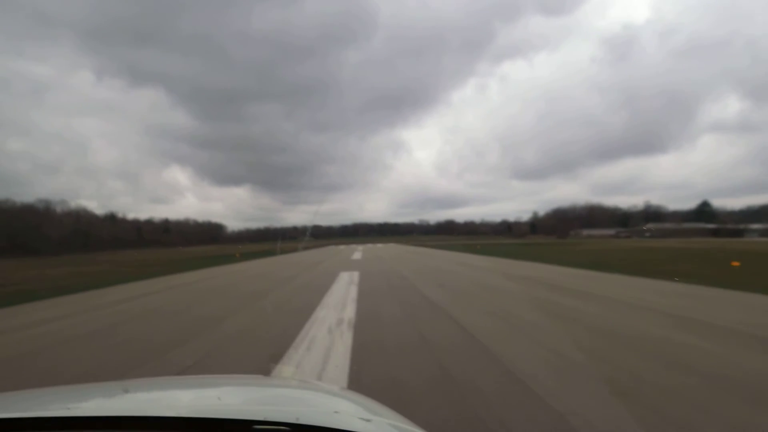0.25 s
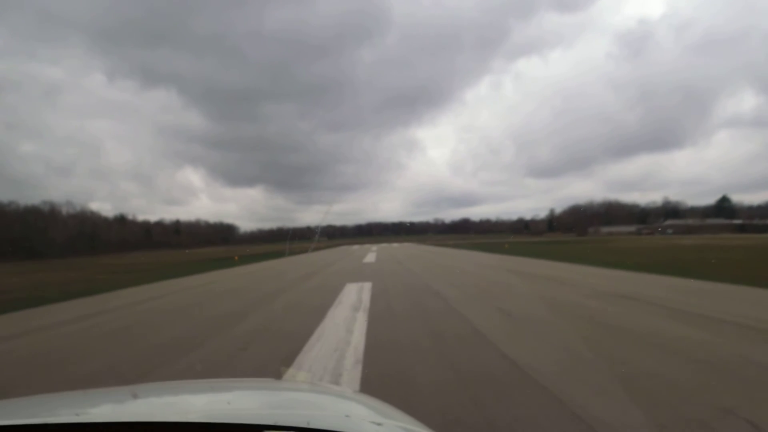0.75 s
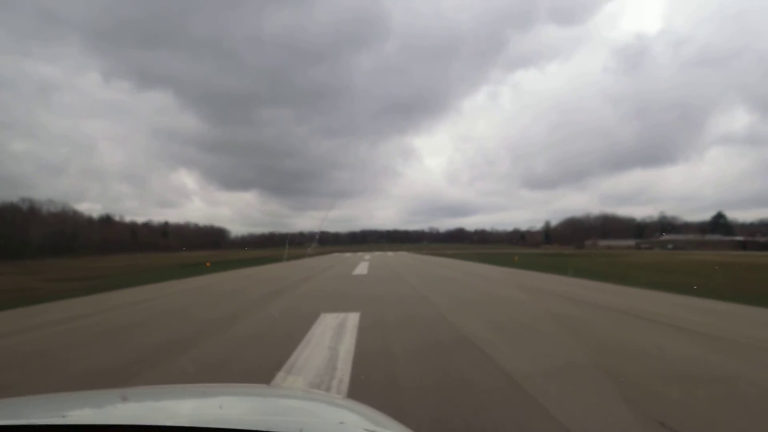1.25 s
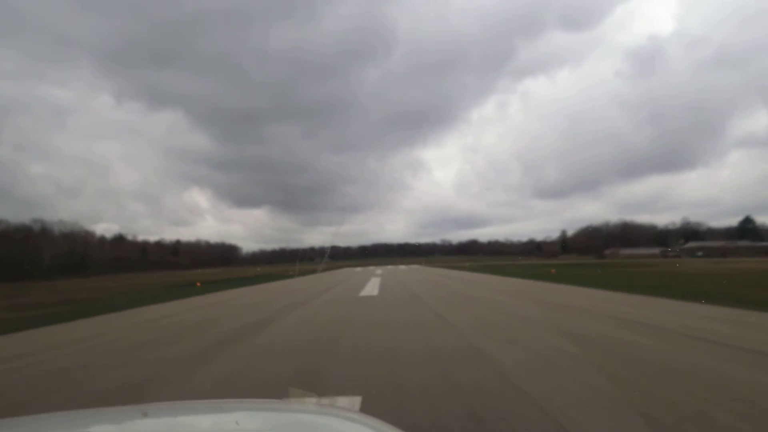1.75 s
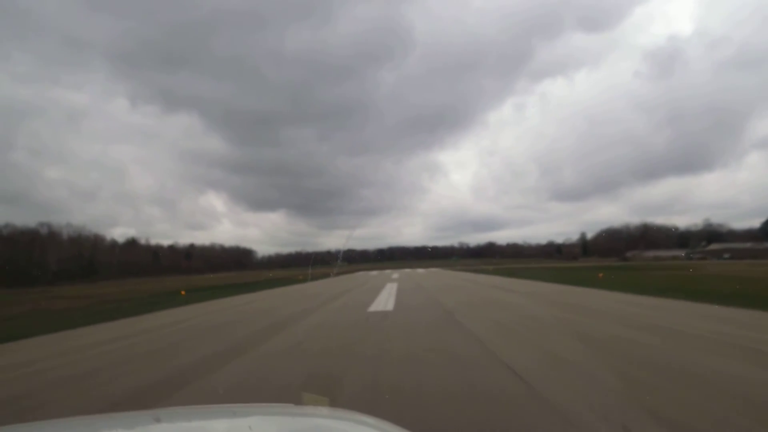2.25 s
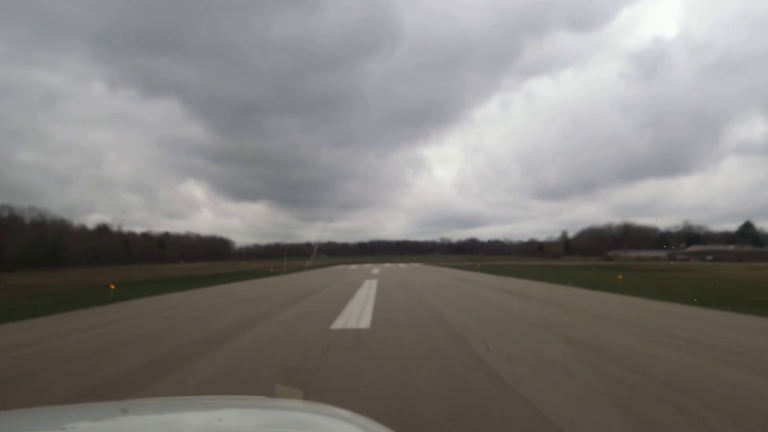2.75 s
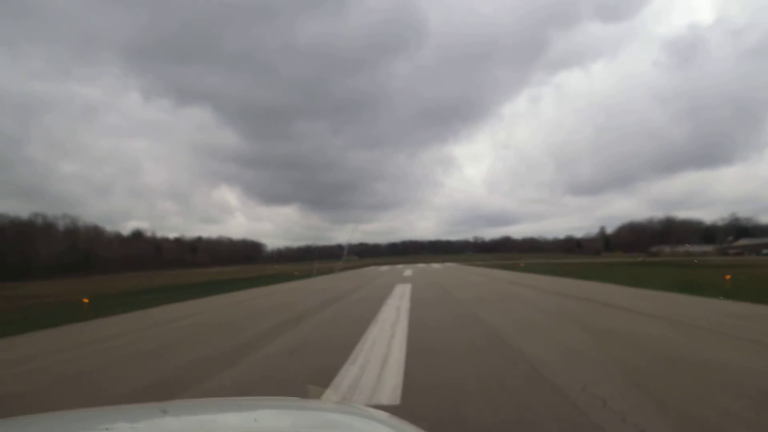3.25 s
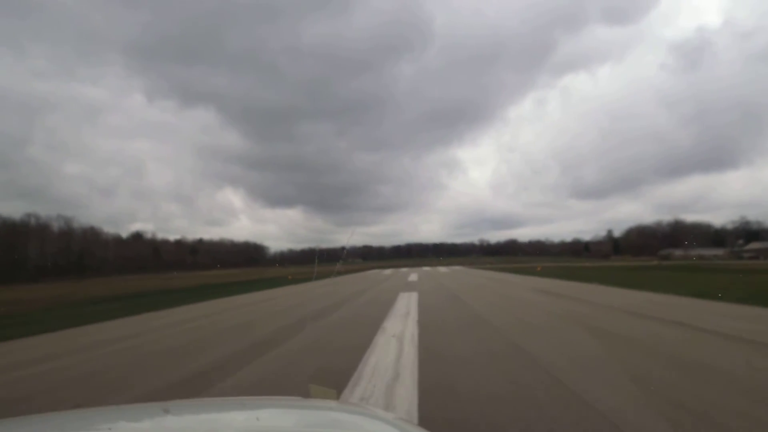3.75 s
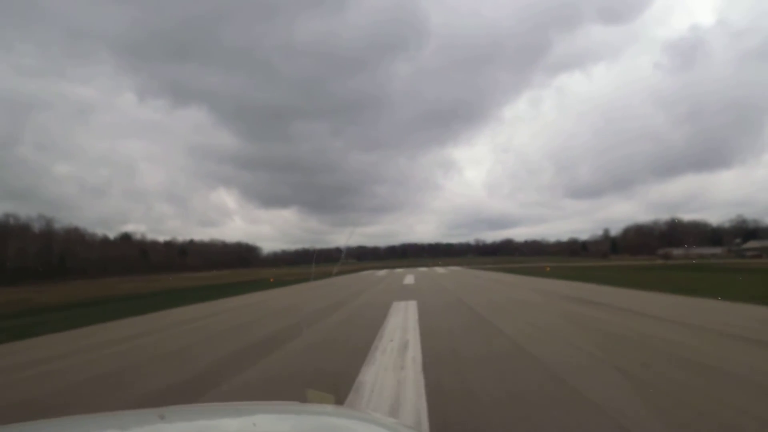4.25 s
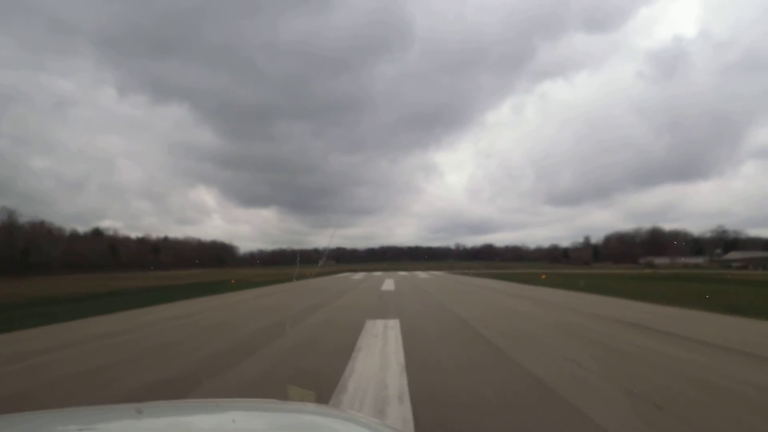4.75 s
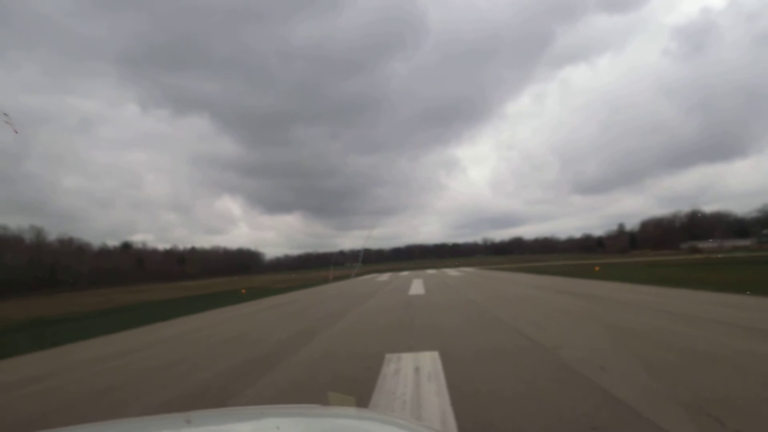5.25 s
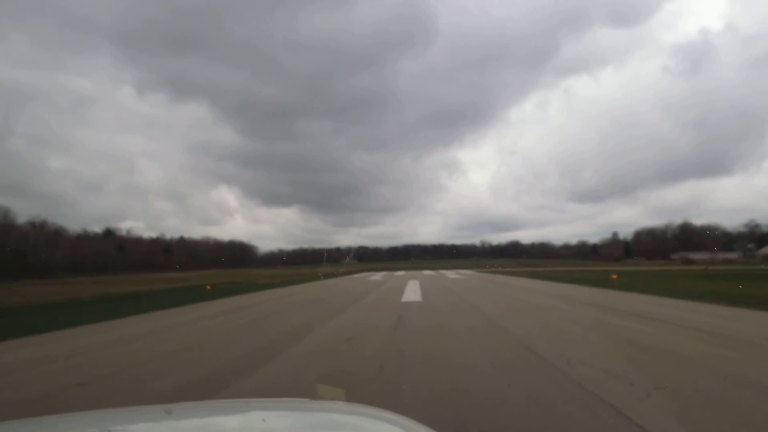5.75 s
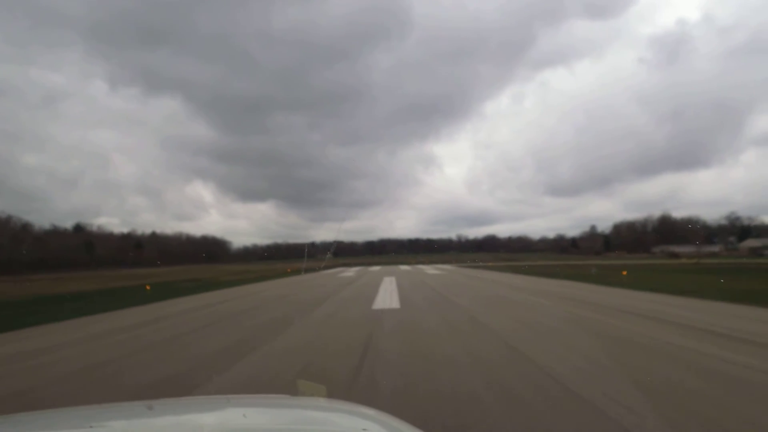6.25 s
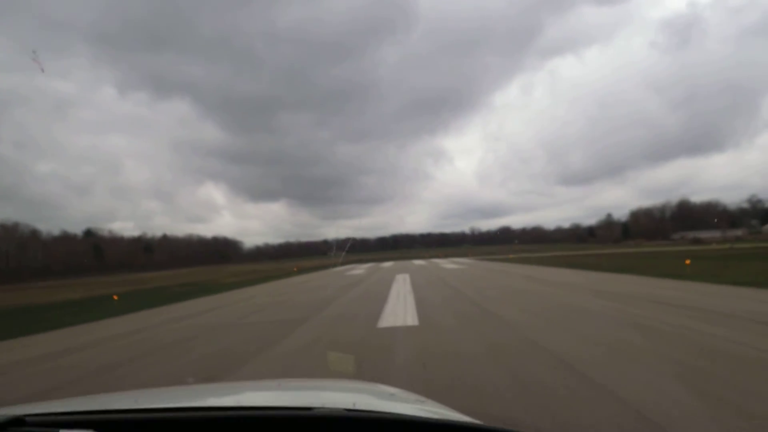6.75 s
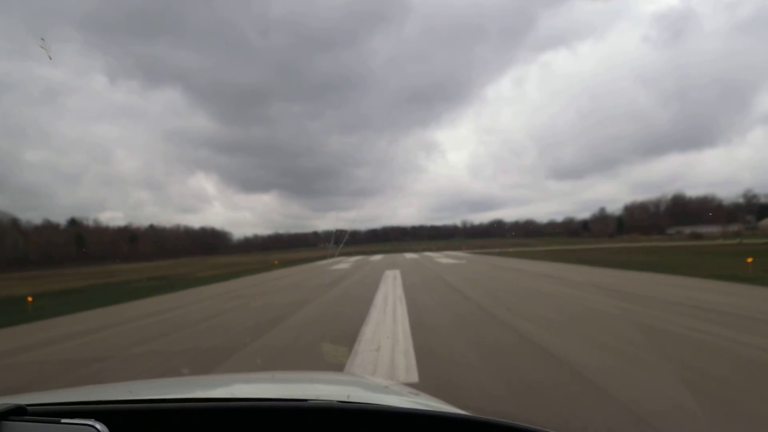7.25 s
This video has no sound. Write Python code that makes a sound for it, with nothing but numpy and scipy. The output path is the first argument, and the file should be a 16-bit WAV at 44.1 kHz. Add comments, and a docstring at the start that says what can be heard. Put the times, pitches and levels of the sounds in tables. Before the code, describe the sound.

Deep wheel rumble and a low propeller drone fill a light aircraft cabin, broken by a loud clattering bump and scattered trim knocks.

```python
"""Inside a light aircraft rolling out along a runway, its six-cylinder engine idling near 840 rpm.
Exhaust and propeller drone under ticking valves. Out-of-round tyres drum, and the runway's grain
rumbles through the cabin as the wheels slow. Leaking air hisses, instruments whine, and loose trim
creaks and knocks. One hard jolt on the camera mount makes the limiter duck everything for a second."""
import sys
import numpy as np
from scipy import signal
from scipy.fft import rfft, irfft
from scipy.io import wavfile
from scipy.ndimage import uniform_filter1d, minimum_filter1d

SR = 44100
rng = np.random.default_rng(int(sys.argv[2]) if len(sys.argv) > 2 else 0)


def master_out(mix):
    """Clip the mix to full scale and print it as 16-bit PCM to the path in sys.argv[1]."""
    frames = np.transpose(np.atleast_2d(mix))
    ceiling = np.clip(frames, -1, 1)
    pcm = np.round(ceiling * 32767).astype(np.int16)
    wavfile.write(sys.argv[1], SR, pcm)


N = 330750
TIME = np.arange(N) / SR
FREQS = np.fft.rfftfreq(N, 1 / SR)

# a wandering idle with a nudge of throttle midway: (time [s], crankshaft speed [rpm])
ENGINE_RPM = [(0, 892.7), (.5, 867.3), (1.5, 857.5), (2, 841.8), (3.5, 834.8), (4, 874), (6, 847.6),
              (6.5, 824.3), (7.5, 830.3)]
# drone partials, the 6th at the firing rate: (multiple of the four-stroke cycle rate, relative level [dB])
ENGINE_ORDERS = [(3, -35), (4, -31), (6, -16), (9, -14), (12, 0), (18, -16), (20, -11.5), (21, -17),
                 (24, -17.5), (25, -21), (30, -18)]
# the valves' rhythm: (place in the four-stroke cycle [0-1], relative level [dB])
VALVE_TAPS = [(.19, -8.5), (.40, -15), (.54, -6), (.61, -12), (.69, -11.5), (.87, -11), (.93, -15.5)]
# tyre partials: (multiple of the wheel rate, relative level [dB])
WHEEL_ORDERS = [(2, -13), (3, -19), (5, -19.5), (6, -0.5), (9, -13)]
# rough stretches of runway: (middle [s], half length [s], extra shake [dB])
ROUGH_PATCHES = [(.55, .3, 4), (2.3, 0.3, 3), (2.99, 0.18, 3), (4.3, 0.27, 3.5), (5.008, 0.087, 6),
                 (5.397, 0.16, 5), (5.856, .17, 8), (6.305, 0.11, 4)]
# the ride of the air hiss: (time [s], level [dB])
HISS_LEVEL = [(0, -41.5), (4, -43), (6.2, -44.5), (6.9, -42.5), (7.5, -46)]
# instrument whines: (pitch [Hz], rms wander [Hz], starting level [dB], rise [dB/s])
WHINES = [(1314, 14, -55.5, 0), (2812, 16, -69, 0), (4931, 9, -65.5, 1), (6577, 12, -55.5, -.2)]

# noise colours: (frequency [Hz], relative level [dB])
VALVE_COLOUR = [(200, -6), (400, 10.5), (550, 0), (800, -4), (1080, -1), (1400, -7.5), (1750, -19.5),
                (2600, -20), (5000, -26), (12000, -62)]  # boxy clatter
SHAKE_COLOUR = [(3, -40), (10, -27), (17, -21), (24, 10), (32, -15), (45, 2), (62, 1.5), (85, -13),
                (160, -47)]  # the airframe's sub-bass
RUMBLE_COLOUR = [(35, -58), (55, -7), (68, 0.5), (100, -2.5), (142, -0.5), (163, -8), (192, -5),
                 (225, -13.5), (320, -44), (700, -48)]  # bass of the rolling wheels
ROAR_COLOUR = [(120, -55), (225, -2.5), (303, 0.5), (323, -9.5), (380, -3.5), (430, -1.5), (480, -7),
               (530, -11.5), (750, -18.5), (1250, -25), (1750, -32), (2800, -31.5), (4000, -38),
               (8000, -90)]  # their low mids
HISS_COLOUR = [(1000, -47), (3000, -15), (4000, -3.5), (4700, 2), (6300, 2.5), (6700, 0.5), (7300, -12.5),
               (8200, -24), (9200, -13.5), (10500, -36), (16000, -45)]  # leaking air
FIZZ_COLOUR = [(3000, -14), (7000, 1.5), (11000, 2.5), (14500, 4), (15700, -0.5)]  # microphone self-noise
CREAK_COLOUR = [(1000, -20), (2000, -11), (2650, 2), (3500, -2.5), (5000, -1), (6300, 10), (7800, -16),
                (9000, -2), (9700, -1.5), (10600, -18), (16000, -33)]  # rubbing plastic

# plastic creaks and ticks: (time [s], level [dB])
CREAKS = [(0.409, -21.5), (0.42, -29.5), (.468, -33), (.487, -33.5), (.532, -38), (1.567, -34),
          (1.845, -42), (2.45, -35), (2.957, -35)]
# the mount's bounces after the blow: (time [s], strength [dB])
MOUNT_CHATTER = [(0.8994, -4), (0.9497, -9), (0.9733, -9.5), (1.004, -10.5), (1.047, -5), (1.085, -13)]
# knocks of loose trim, brighter when the contact is short: (time [s], strength [dB], contact [s])
TRIM_KNOCKS = [(1.335, -14.5, 0.00072), (1.433, -15, 0.00067), (4.230, -15, 0.0007), (4.537, -18, 0.00065),
               (4.584, -18, 0.00055), (4.752, -17.5, 0.00072), (4.965, -13, 0.00068),
               (5.0052, -12.5, 0.00054), (5.099, -26, .0001), (6.255, -21.5, 0.00089)]
# how the struck parts ring: (frequency [Hz], relative level [dB], time to fall 60 dB [s])
MOUNT_MODES = [(340, -2.5, 0.095), (373, -7.5, 0.058), (585, -7, 0.025), (640, -15, .025),
               (800, -27, 0.018), (1150, -15, 0.018)]
TRIM_MODES = [(302.8, -6, 0.3), (626, -3, 0.014), (904, -12.5, 0.028), (1064, -5.5, 0.036),
              (1220, -11, 0.02), (1500, -15, .02), (1780, -13.5, 0.02), (2370, -1.5, 0.012)]
FITTING_MODES = [(2740, -13, .04), (3670, -16.5, 0.07), (5620, -2, .04), (5680, -7, 0.027)]

# stereo width of the noises: (frequency [Hz], side relative to mid [dB])
STEREO_WIDTH = [(25, -18), (70, -21), (140, -28), (220, -25), (310, -14), (420, -25), (600, -23),
                (770, -12), (900, -22), (1050, -13), (1400, -33), (3500, -31), (5000, -14), (6300, -7),
                (8000, 0)]
# lean between the microphones: (frequency [Hz], left minus right [dB])
STEREO_BALANCE = [(90, -.2), (210, -1), (330, -1.6), (500, -.3), (770, 0), (1100, -1.5), (1500, 0),
                  (3300, 0), (4500, -2.7), (6400, -4.7), (8000, -.5), (15000, 0)]
# phase between the microphones: (frequency [Hz], left lead [rad])
LEFT_LEAD = [(20, 0), (70, 0.31), (150, -0.044), (400, 0.015), (740, -0.29), (1000, 0.39), (1200, 0.14),
             (1400, 0.39), (4500, -0.38), (6000, 0.81), (6700, -0.0091)]
# notches in the camera's tone: (centre [Hz], width [Hz])
NOTCHES = [(1605, 164), (2078, 350), (3190, 620), (4160, 594), (7870, 110)]


def gain_of(db):
    """Decibels to amplitude."""
    return 10 ** (np.asarray(db) / 20)


def unit_rms(x):
    """Scales a signal to rms 1."""
    return x / np.sqrt(np.mean(x ** 2) + 1e-20)


def automation(points):
    """Breakpoints joined by straight lines in time."""
    return np.interp(TIME, *np.transpose(points))


def eq_curve(points):
    """Breakpoints in decibels as a gain for each frequency."""
    hz, db = np.transpose(points)
    return gain_of(np.interp(np.log(FREQS + 1), np.log(hz), db))


def add(mix, start_s, sound):
    """Drops a sound into the mix at a time."""
    part = mix[round(start_s * SR):][:len(sound)]
    part += sound[:len(part)]


def drift(hz):
    """A random wobble of rms 1, rolled off above the given rate."""
    lowpass = (FREQS > 0) / (1 + (FREQS / hz) ** 4)
    return unit_rms(irfft(rfft(rng.standard_normal(N)) * lowpass, N))


def noise(colour):
    """Coloured mid/side stereo noise of rms 1."""
    rolloff_hz = 2 * colour[-1][0]
    gain = eq_curve(colour) / (1 + (FREQS / rolloff_hz) ** 4)
    mid, side = rfft(rng.standard_normal((2, N))) * gain
    return unit_rms(irfft(mid + np.outer([1, -1], side * eq_curve(STEREO_WIDTH)), N))


def partials(turns, orders, waver=.15):
    """Harmonics of a rotation, each wavering in strength."""
    tone = np.zeros(N)
    for multiple, db in orders:
        level = gain_of(db) * (1 + waver * drift(3.7))
        tone += level * np.sqrt(2) * np.sin(2 * np.pi * (multiple * turns + rng.random()))
    return tone


def ring(modes, scatter, contact_s):
    """The dying modes of a struck part, detuned at random by scatter; a long contact dulls them."""
    t = np.arange(SR // 4) / SR
    struck = np.zeros(len(t))
    for hz, db, t60 in modes:
        detuned_hz = hz * (1 + scatter * rng.standard_normal())
        struck += gain_of(db - 60 * t / t60) * np.sin(2 * np.pi * detuned_hz * t)
    force = np.sin(np.pi * np.linspace(0, 1, round(contact_s * SR) + 2)[1:-1]) ** 2
    return np.convolve(struck, force / force.sum())


def engine():
    """Exhaust and propeller drone, with valve taps that repeat every four-stroke cycle."""
    cycle_hz = automation(ENGINE_RPM) / 120  # two crankshaft turns a cycle
    cycles = np.cumsum(cycle_hz) / SR
    drone = partials(cycles, ENGINE_ORDERS)
    taps, tap_decay_s = np.zeros(N), 0.01
    for place, db in VALVE_TAPS:
        since_tap_s = ((cycles - place) % 1) / cycle_hz
        taps += gain_of(db) * np.exp(-since_tap_s / tap_decay_s)
    taps = uniform_filter1d(taps, size=280)  # the firewall blunts each tap
    clatter = unit_rms(taps * gain_of(2.2 * drift(14))) * noise(VALVE_COLOUR)
    return gain_of(-21.5) * drone + gain_of(-38) * clatter


def tyre_drum(wheel_hz):
    """Out-of-round tyres drum, swelling as their strong 6th partial slides through a cabin resonance."""
    boom_hz, boom_width_hz = 74.2, 7.5
    drumming = partials(np.cumsum(wheel_hz) / SR, WHEEL_ORDERS)
    boom = 1 / (1 + (2 * (6 * wheel_hz - boom_hz) / boom_width_hz) ** 2)
    return gain_of(-16.5) * boom * drumming


def runway(slowed_hz):
    """The runway's grain shakes the cabin: three beds that surge on rough patches and ease with speed."""
    rough_db = sum(db * np.exp(-((TIME - middle_s) / half_s) ** 2)
                   for middle_s, half_s, db in ROUGH_PATCHES)
    shake = gain_of(-22 - 2.5 * slowed_hz + rough_db) * noise(SHAKE_COLOUR)
    rumble = gain_of(-20 - .5 * slowed_hz + .62 * rough_db) * noise(RUMBLE_COLOUR)
    roar = gain_of(-27 - slowed_hz + .21 * rough_db + 1.04 * drift(32)) * noise(ROAR_COLOUR)
    return shake + rumble + roar


def air_leak():
    """Air leaks into the cabin with a lightly fluttering hiss."""
    return gain_of(automation(HISS_LEVEL) + 0.8 * drift(26)) * noise(HISS_COLOUR)


def instrument_whines():
    """Thin tones from the instruments, unsteady in pitch and level."""
    whines = np.zeros(N)
    for hz, wander_hz, db, rise_db_per_s in WHINES:
        turns = np.cumsum(hz + wander_hz * drift(40)) / SR
        level = gain_of(db + rise_db_per_s * TIME + drift(7))
        whines += level * np.sqrt(2) * np.sin(2 * np.pi * turns)
    return whines


def microphone_fizz():
    """The microphones' own noise, a faint steady top end."""
    return gain_of(-51) * noise(FIZZ_COLOUR)


def plastic_creaks():
    """Plastic trim rubs in short, grainy bursts and rings on briefly."""
    creak_s, tail_s = 0.013, 0.0056
    rubbing = np.zeros(N)
    for start_s, db in CREAKS:
        add(rubbing, start_s, gain_of(db) * np.hanning(round(creak_s * SR)) ** .5)
    fade = np.exp(-1 / (tail_s * SR))
    rubbing = signal.lfilter([1 - fade], [1, -fade], rubbing)
    grain = unit_rms(gain_of(1.2 * drift(400)))
    return rubbing * grain * noise(CREAK_COLOUR)


def mount_jolt():
    """The camera mount takes a hard blow and chatters: each contact is a dull thump and a ring."""
    blow_s, blow_ring_db, blow_thump_db = 0.8554, 0.5, 12
    bounces = [(start_s, db, db - 6) for start_s, db in MOUNT_CHATTER]  # lighter on the thump
    jolt, thump = np.zeros(N), np.hanning(round(0.00493 * SR))
    for start_s, ring_db, thump_db in [(blow_s, blow_ring_db, blow_thump_db)] + bounces:
        add(jolt, start_s, gain_of(ring_db) * ring(MOUNT_MODES, scatter=0.029, contact_s=0.00088))
        add(jolt, start_s, gain_of(thump_db) * thump)
    return jolt


def trim_knocks():
    """Loose panels knock and ring, and a small metal fitting tinks once."""
    knocks = np.zeros(N)
    for start_s, db, contact_s in TRIM_KNOCKS:
        add(knocks, start_s, gain_of(db) * ring(TRIM_MODES, scatter=0.033, contact_s=contact_s))
    tink = gain_of(-20) * ring(FITTING_MODES, scatter=0, contact_s=.0001)
    add(knocks, start_s=1.576, sound=tink)
    return knocks


def scene():
    """The cabin mix, at two close microphones that differ a little in level and phase."""
    start_wheel_hz, braking_hz_per_s = 13.81, .429
    slowed_hz = braking_hz_per_s * TIME  # wheel rate lost so far
    cabin = engine() + tyre_drum(start_wheel_hz - slowed_hz) + runway(slowed_hz)
    cabin += air_leak() + instrument_whines() + microphone_fizz()
    cabin += mount_jolt() + trim_knocks() + plastic_creaks()
    lead_rad = np.interp(FREQS, *np.transpose(LEFT_LEAD))
    left_over_right = eq_curve(STEREO_BALANCE) * np.exp(1j * lead_rad)
    return irfft(rfft(cabin) * left_over_right ** np.array([[.5], [-.5]]), N)  # half to each side


def record(dry):
    """The camera's chain: notches, a peak limiter that grabs fast and lets go slowly, then a high cut."""
    ceiling_db, recovery_db_per_s, high_cut_hz = -1.4, 12.8, 15740
    dry = dry * signal.windows.tukey(N, .001)  # click-free ends
    for hz, width_hz in NOTCHES:
        dry = signal.lfilter(*signal.iirnotch(hz, hz / width_hz, SR), dry)
    peak_db = 20 * np.log10(abs(dry).max(0) + 1e-9)
    release_db = TIME * recovery_db_per_s
    held_db = np.maximum.accumulate(peak_db + release_db) - release_db
    duck_db = np.minimum(ceiling_db - held_db, 0)
    # the gain looks a little ahead and glides down, so peaks stay round
    duck_db = minimum_filter1d(duck_db, size=150)
    duck_db = uniform_filter1d(uniform_filter1d(duck_db, size=80), size=80)
    high_cut = signal.firwin(711, high_cut_hz, window=("kaiser", 9), fs=SR)
    return signal.oaconvolve(dry * gain_of(duck_db), high_cut[None], "same")


dry = scene()
out = record(dry)
master_out(out)
```